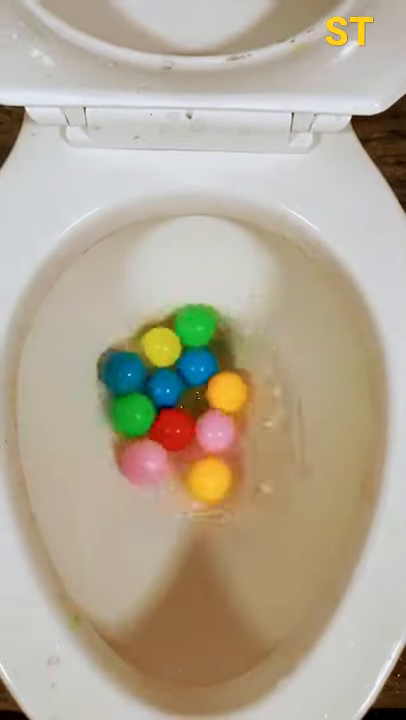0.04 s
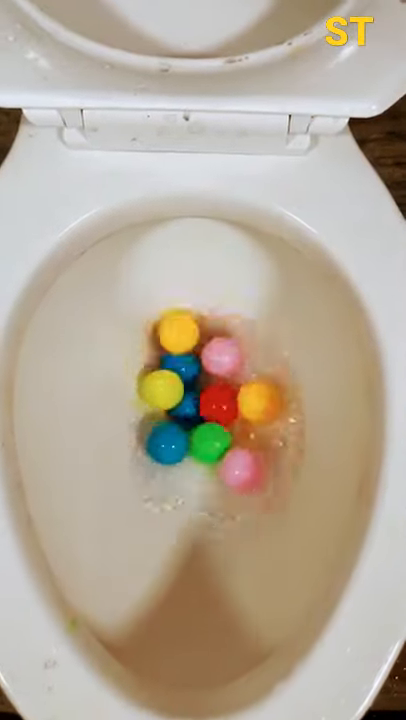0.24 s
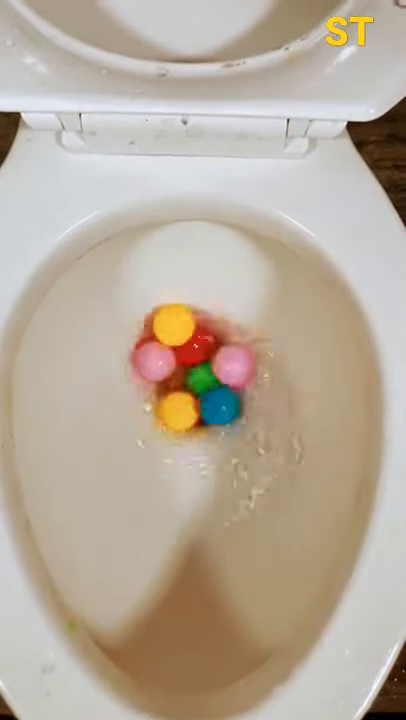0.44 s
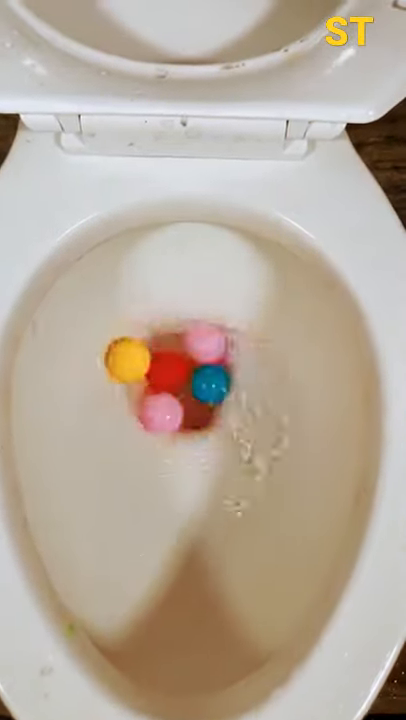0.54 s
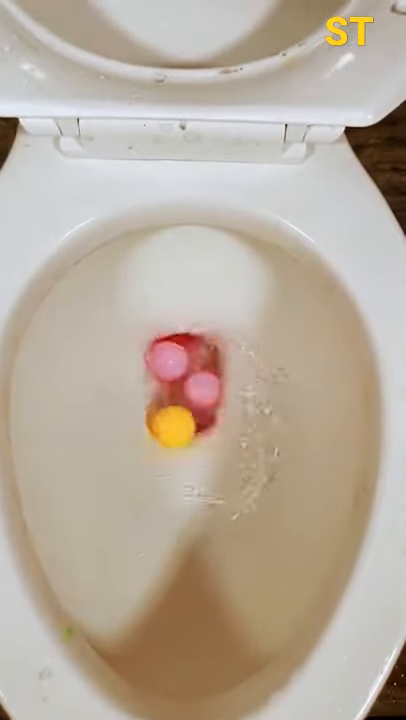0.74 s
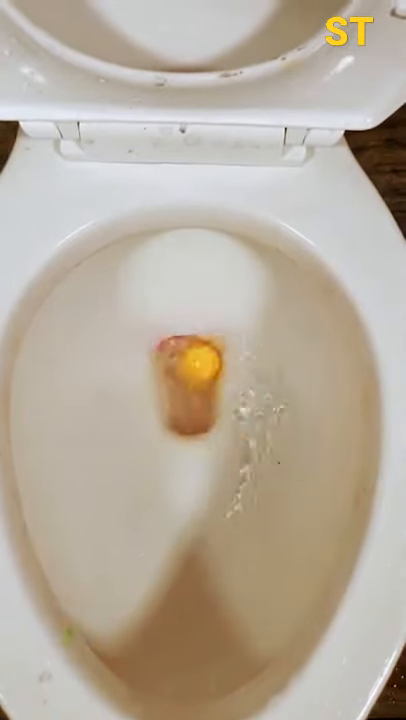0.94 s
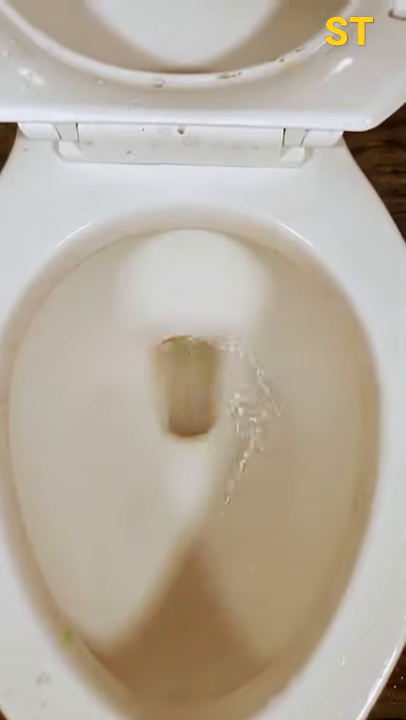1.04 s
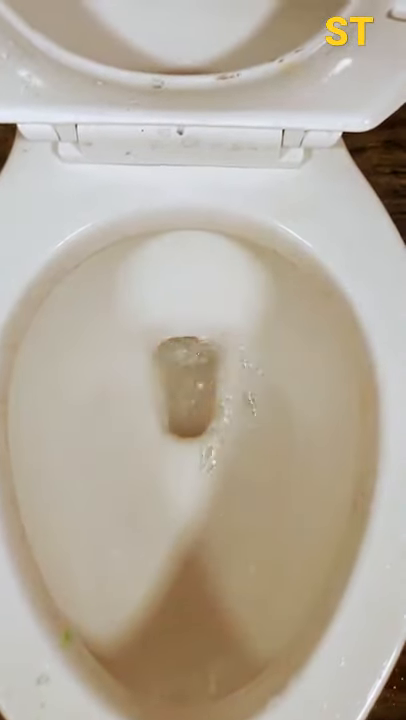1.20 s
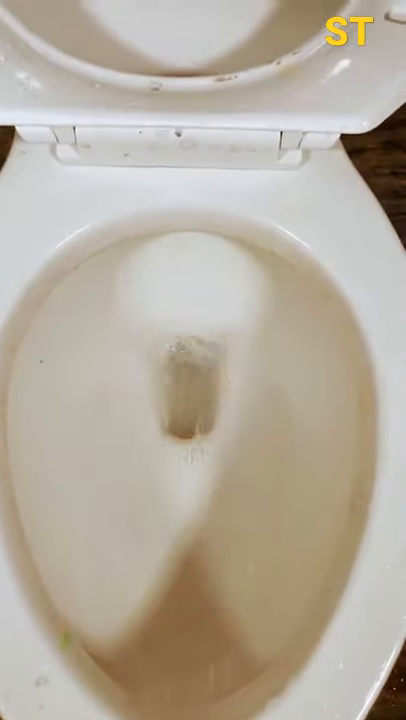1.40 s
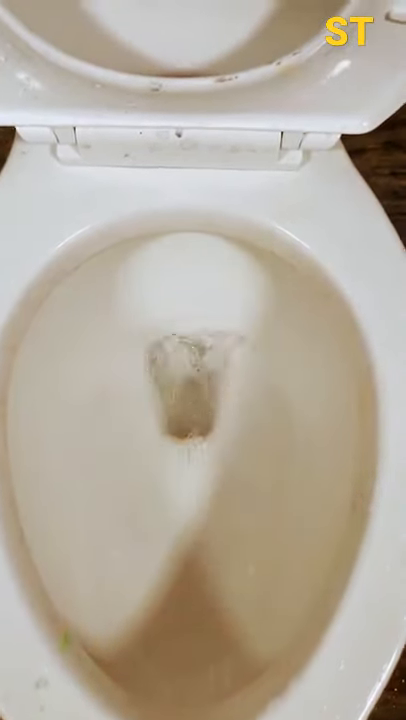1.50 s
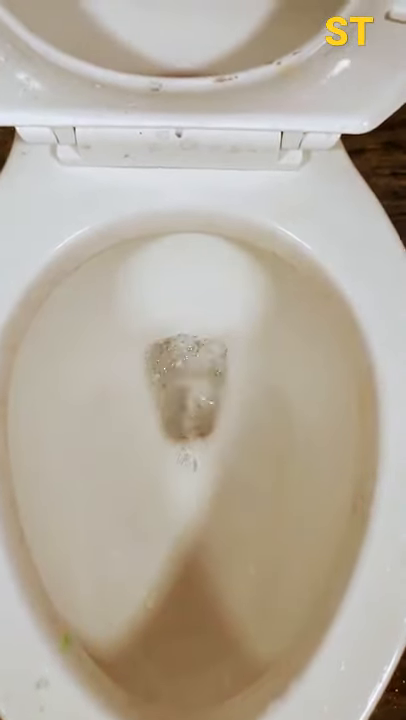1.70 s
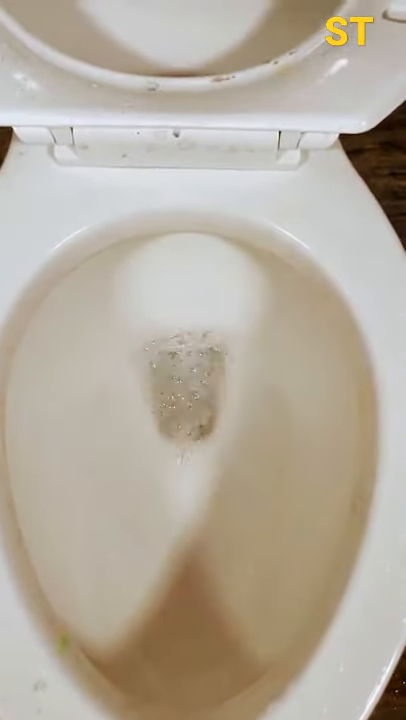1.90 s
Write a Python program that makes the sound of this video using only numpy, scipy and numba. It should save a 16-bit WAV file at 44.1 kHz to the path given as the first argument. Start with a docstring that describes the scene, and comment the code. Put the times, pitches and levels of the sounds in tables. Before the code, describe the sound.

Close stereo pickup of a toilet flush: water hisses and fizzes, the drain quickly gulps air in thick glugs while hollow balls click lightly, then the gurgling breaks up and tapers off with short bathroom echoes.

```python
"""A toilet flushes, heard from just above the bowl. Water swirls light balls down the drain, which gulps air in deep glugs.
The balls knock together, pockets of air plop, small bubbles babble, and the rim jets spray until the flow tapers off.
Glugs, plops and bubbles are damped sines of rising pitch; spray joins such bubbles to filtered noise; knocks are short modes.
The bowl and a small bathroom ring briefly; two microphone ports a few centimetres apart pick it up."""
import sys
import numpy as np
from scipy import signal
from scipy.fft import rfft, irfft
from scipy.io import wavfile
from numba import njit

SR = 44100
rng = np.random.default_rng(int(sys.argv[2]) if len(sys.argv) > 2 else 0)


def file_out(sig):
    """Save sig as 16-bit WAV at sys.argv[1]."""
    # one column per channel
    cols = np.atleast_2d(sig).T
    # limit, then scale
    lim = np.clip(cols, -1, 1)
    pcm = np.round(lim * 32767).astype(np.int16)
    wavfile.write(sys.argv[1], SR, pcm)


N = 85995  # samples, 1.95 s
T = np.arange(N) / SR
BINS_HZ = np.arange(N // 2 + 1) * SR / N

# Level of the rumble in the pipes. Each row: time in seconds, relative level in dB.
PIPE_LEVEL = [(0,3),(0.6,-2.5),(1.3,-1),(1.95,-8)]
# Level of the babbling swirl. Each row: time in seconds, relative level in dB.
SWIRL_LEVEL = [(0,-40.5),(0.17,-41.5),(0.29,-34),(0.44,-25.5),(0.6,-28),(0.8,-31),(1.12,-33),(1.3,-36.5),(1.42,-28.5),(1.53,-33.5),(1.6,-37),(1.74,-38),(1.95,-39.5)]
# Level of the gurgling drain. Each row: time in seconds, relative level in dB.
GURGLE_LEVEL = [(0,-45.5),(0.24,-38.5),(0.35,-30),(0.52,-23.5),(0.62,-25),(0.78,-32.5),(0.95,-37),(1.18,-30),(1.3,-35),(1.5,-35.5),(1.6,-37),(1.95,-44)]
# Level of the fizzing bubbles. Each row: time in seconds, relative level in dB.
FIZZ_LEVEL = [(0,-33),(0.15,-36.5),(0.35,-31),(0.62,-33.5),(0.75,-33.5),(0.87,-31),(1.08,-32),(1.28,-34.5),(1.43,-33.5),(1.63,-35.5),(1.82,-34.5),(1.95,-42)]
# Level of the rim spray. Each row: time in seconds, relative level in dB.
SPRAY_LEVEL = [(0,-39),(0.22,-38.5),(0.45,-34),(0.62,-33),(0.71,-35),(0.86,-34),(0.99,-35.5),(1.06,-34.3),(1.25,-36.5),(1.43,-35),(1.62,-37),(1.8,-41),(1.95,-45)]

# Single small bubbles that ring out. Each row: start in seconds, relative level in dB, middle pitch in Hz.
BUBBLE_DRIPS = [(0.027,-14.5,2980),(0.229,-8.5,2610),(0.238,-8.5,1980),(0.29,-10.5,2500),(0.324,-15,3300),(0.424,-17,6700),(0.47,-11,3480),(0.505,-21,3100),(0.6641,-5.5,3810),(0.73,-13,5780),(0.78,-16,3800),(0.787,-17,5640),(0.835,-14,2570),(0.867,-17,2600),(0.934,-13.5,5860),(0.9532,-7.5,2340),(1.05,-14,6130),(1.083,-11.5,3550),(1.406,-15,2730),(1.4655,-11.5,3420),(1.529,-21,3850),(1.726,-8.5,1940),(1.774,-14,3360),(1.8113,-10.5,3270)]
# Plops in the swirl. Each row: start in seconds, relative level in dB, middle pitch in Hz,
# relative level of the splash in dB.
SWIRL_PLOPS = [(0.22,-11,686,-45),(0.22,-13.5,1320,-37),(0.2699,-15,1315,-30.5),(0.272,-12,700,-50),(0.3518,-15,1220,-42),(0.376,-25,1230,-32),(0.382,-24,1430,-26.5),(0.4125,-4.5,1206,-42),(0.4402,-8,1290,-32),(0.460,-6.5,1100,-33),(0.468,-11,1220,-28),(0.484,-7,1180,-37),(0.5103,-11,1180,-29.5),(0.527,-10,1143,-36),(0.5971,0,1280,-26.5),(0.6092,-9,1360,-29),(0.617,-7,1520,-30),(0.6222,-3.5,1496,-26.5),(0.636,-5.5,1005,-25.5),(0.6732,-7.5,1290,-30.5),(0.708,-19,1310,-45),(0.721,-32,1072,-50),(0.762,-9.5,1330,-36),(0.827,-14,1210,-41),(0.847,-8,1226,-31.5),(0.8916,-7.5,1130,-33.5),(0.99,-13,1320,-48),(1.0207,-3.5,1020,-28.5),(1.0264,-3,1160,-29),(1.045,-15,640,-39),(1.104,-15,1110,-33),(1.132,-13,1120,-36),(1.264,-20,1240,-31),(1.367,-21,1315,-32),(1.387,-12,1090,-46),(1.3927,-4,1283,-29),(1.435,-17,1190,-30.5),(1.482,-18,1090,-46),(1.514,-17,1330,-33),(1.571,-11,1100,-36),(1.915,-18,1200,-52)]
# Glugs of the drain. Each row: start in seconds, relative level in dB, middle pitch in Hz,
# relative level of the upper resonance in dB.
DRAIN_GLUGS = [(0.283,-20.5,294,-28),(0.299,-17.5,320,-40),(0.375,-21,340,-47),(0.413,-7,271,-15),(0.429,-9.5,301,-47),(0.468,-11.5,321,-43),(0.483,-12,310,-37),(0.509,-8,330,-21),(0.535,-5.5,318,-43),(0.5512,-4.5,371.5,-10.5),(0.559,-19,325,-46),(0.578,-9,307,-35),(0.632,-8,314,-40),(0.6435,-40,294,-9),(0.675,-8.5,329,-24),(0.707,-14.5,381,-43),(0.722,-3.5,355,-46),(0.764,-18,330,-24),(0.821,-11,316,-31),(0.858,-9.5,372,-20),(0.891,-8.5,322,-44),(0.911,-17,310,-43),(0.931,-8.5,290,-21),(0.99,-15,370,-24),(1.004,-5.5,335,-35),(1.024,-27,330,-15.5),(1.095,-16,347,-12),(1.116,-25,344,-24),(1.13,-22,340,-33),(1.163,-13,311,-32),(1.181,-15.5,312,-32),(1.208,-15.5,314,-25.5),(1.229,-21,305,-39),(1.325,-18.5,323,-34),(1.347,-21.5,331,-36),(1.386,-18,334,-30),(1.406,-17,305,-48),(1.448,-14,283,-47),(1.498,-15,312,-25.5),(1.666,-20.5,314,-44)]
# Spits of spray on the porcelain. Each row: start in seconds, relative level in dB.
SPRAY_SPITS = [(0.2912, -18), (0.4373, -10.5), (0.4664, -11), (0.5497, -12), (0.599, -9), (0.7794, -12),
               (1.049, -12), (1.0834, -11.5), (1.409, -10), (1.4444, -10.5), (1.5215, -12.5)]
# Knocks of the balls. Each row: start in seconds, relative level in dB, lowest mode in Hz.
BALL_KNOCKS = [(0.3378,-7,1320),(0.3818,-21,1580),(0.55,-12,1274),(0.6055,-17,1330),(0.644,-16,1370),(1.1015,-16,1430)]
# Modes of a hollow ball. Each row: ratio to the lowest mode, relative level in dB, decay in seconds.
HOLLOW_BALL_MODES = [(1,2,0.00087),(1.5,-10.5,0.0043),(2.2,-11,.0012),(3.1,-11.5,0.0015)]

# Filter that shapes the rumble in the pipes. Each row: frequency in Hz, gain in dB.
PIPE_SPECTRUM = [(20,-23),(40,-12),(60,4.5),(85,1),(115,4),(150,-7),(192,6.5),(240,-13.5),(480,-2),(800,-6.5),(2000,-27),(6000,-49)]
# Filter that shapes the swirling water. Each row: frequency in Hz, gain in dB.
SWIRL_SPECTRUM = [(150,-41),(350,-41),(500,-3.5),(700,3),(860,-13.5),(1020,2),(1150,3.5),(1300,4.5),(1520,4.5),(1720,-6.5),(1930,-7),(2200,-25),(3200,-8.5),(5000,-37),(8000,-80)]
# Filter that shapes the gurgle in the drain. Each row: frequency in Hz, gain in dB.
GURGLE_SPECTRUM = [(120,-12),(190,-7),(240,-5),(300,-2),(390,-3),(460,-7.5),(620,-5.5),(720,-14),(850,-7.5),(1200,-54),(3000,-70)]
# Filter that shapes the fizz and the splashes. Each row: frequency in Hz, gain in dB.
FIZZ_SPECTRUM = [(600,-39),(1200,11),(1900,4.5),(2600,0.5),(4000,-2.5),(5000,-6.5),(7000,-1),(10000,-23),(13000,-50)]
# Filter that shapes the spray and the spits. Each row: frequency in Hz, gain in dB.
SPRAY_SPECTRUM = [(900,-26),(2000,-13),(3500,-4),(5000,-5.5),(6000,-.5),(8500,-.5),(9600,0),(10600,3),(11500,1),(12400,-7),(13200,-17),(14000,-38)]
# How fast the spray flutters. Each row: flutter rate in Hz, gain in dB.
FLUTTER_SPECTRUM = [(4, 5), (12, -7), (60, -9), (250, -60), (900, -70)]

# Share of the fizz heard from near the rim. Each row: frequency in Hz, gain in dB.
RIM_FIZZ_SHARE = [(1900,-16),(2900,-4)]
# Share of the fizz heard from deep in the bowl. Each row: frequency in Hz, gain in dB.
DEEP_FIZZ_SHARE = [(1900,-1),(4000,2.5),(6500,-50.5)]
# The bowl radiates little bass. Each row: frequency in Hz, gain in dB.
BOWL_BASS_LOSS = [(40,-25),(120,-16),(230,-1.5)]
# Resonances of the air in the bowl. Each row: frequency in Hz, relative level in dB, 60 dB decay in seconds.
BOWL_RESONANCES = [(190,-26,0.2),(296,1,0.06),(391,5.5,0.1),(613,-15,0.04),(1013,6,0.065),(1330,-2,0.072),(1564,-15,0.06),(1900,-19,0.044)]
# Walls soak up the treble. Each row: frequency in Hz, gain in dB.
WALL_COLOUR = [(300,-1),(1000,1),(2800,0.5),(4500,3),(7000,-14),(12000,-66)]
# How unlike the echoes are at the two ports. Each row: frequency in Hz, side against mid in dB.
ECHO_WIDTH = [(200,-22),(600,-10),(1000,-4),(1800,-6),(2700,2),(4500,2)]
# The deep sounds at the two ports. Each row: frequency in Hz, left over right in dB.
DEEP_BALANCE = [(100,4.5),(300,-3.5),(480,5.5),(680,-1.5),(850,12),(1020,11.5),(1400,5),(1700,0.5),(2000,-1),(3000,1),(5000,7)]
# The deep sounds at the two ports. Each row: frequency in Hz, lead of the left in radians.
DEEP_PHASE = [(150,0),(300,.3),(430,.7),(510,.25),(780,1.4),(860,1.2),(960,-1.3),(1100,-.3),(1600,-.1),(2100,.2),(2700,.8),(3700,0),(4400,.6)]

# Layer trims are in dB; a glide is the fraction by which the pitch bends below and above its middle
PIPE_DB, SWIRL_DB, CHURN_DB, GURGLE_DB = -35.5, 0, -13, 0
FIZZ_DB, WASH_DB, DROPS_DB, HISS_DB = -3, -6.5, -3.5, 0
FLUTTER_RMS_DB = 2.3
DRIP_DB, DRIP_RISE_S, DRIP_DECAY_S, DRIP_GLIDE = -13, 0.0018, 0.0028, 0.054
PLOP_DB, PLOP_RISE_S, PLOP_DECAY_S, PLOP_GLIDE = -5.5, 0.0011, 0.0027, 0.027
SPLASH_DB, SPLASH_DECAY_S = 9, 0.0063
GLUG_DB, GLUG_RISE_S, GLUG_DECAY_S, GLUG_GLIDE = -0.5, 0.003, 0.0057, 0.091
UPPER_DB, UPPER_RISE_S, UPPER_DECAY_S = 6, 0.0017, 0.0036
UPPER_HZ, UPPER_SCATTER = 648, 0.04  # scatter is a fraction either way
SPIT_DB, SPIT_DECAY_S = -6.5, 0.0033
KNOCK_DB, KNOCK_CONTACT_S = 0.5, 0.00025
BOWL_DB, ROOM_DB, ROOM_T60_S = -6, -8, 0.083
PORT_LAG_MS = 0.17
LOW_CUT_HZ, TOP_HZ, CEILING = 30, 14000, 0.92  # the ceiling is a share of full scale


def undb(db):
    """Decibels to gain."""
    return 10 ** (np.asarray(db) / 20)


def unit(x):
    """Scale to an rms of one."""
    return x / np.sqrt(np.mean(x ** 2))


def follow(curve):
    """Gain along a level curve."""
    return undb(np.interp(T, *np.array(curve).T))


def per_bin(points):
    """Join points by straight lines on a log-frequency axis."""
    hz, value = np.array(points).T
    return np.interp(np.log(BINS_HZ + 1), np.log(hz), value)


def colour(x, points):
    """Filter by a spectrum."""
    return irfft(rfft(x) * undb(per_bin(points)), N)


def coloured_noise(points):
    """Steady noise through a spectrum, at an rms of one."""
    return unit(colour(rng.standard_normal(N), points))


def add(out, start, sound):
    """Mix a sound in at a time."""
    i = max(int(start * SR), 0)
    out[i:i + len(sound)] += sound[:N - i]


def swell(rise, decay):
    """A rounded rise and an exponential decay."""
    t = T[:N // 20]
    attack = np.sin(np.pi / 2 * np.minimum(t / rise, 1)) ** 2
    return attack * np.exp(-np.maximum(t - rise, 0) / decay)


def pocket(hz, rise, decay, glide):
    """A pocket of air rings for a few cycles, its pitch rising as it nears the surface."""
    shape = swell(rise, decay)
    t = T[:len(shape)]
    pitch = hz * (1 + glide * np.tanh((t - rise) / decay - .5))
    return shape * np.sin(2 * np.pi * np.cumsum(pitch) / SR)


def bursts(rows, decay):
    """Short noise bursts of thrown water, from rows of start and level."""
    out = np.zeros(N)
    shape = swell(decay / 2, decay)
    for start, db in rows:
        add(out, start, undb(db) * shape * rng.standard_normal(len(shape)))
    return out


@njit
def ring(starts, hz, cycles, size, glide):
    """Sum of damped, rising sines, one for each bubble."""
    out = np.zeros(N)
    for k in range(len(hz)):
        length = int(cycles[k] * SR / hz[k]) + 2
        w = 2 * np.pi * hz[k] / SR
        z = size[k] + 0j
        step = np.exp(1j * w - 6 / length)  # turns and shrinks the phasor each sample
        bend = np.exp(1j * w * glide / length)  # here the glide is the whole rise over the life
        first = int(starts[k] * N)
        for i in range(first, min(first + length, N)):
            z *= step
            step *= bend
            out[i] += z.imag
    return out


def bubbles(count, low_hz, high_hz, cycles, spread_db, glide):
    """A cloud of bubbles of random start, pitch, life and size."""
    when, pitch, life, size = rng.random((count, 4)).T
    hz = low_hz * (high_hz / low_hz) ** pitch
    size_db = -spread_db * np.log(size + 1 / 40)  # a few stand out
    gain = undb(size_db) * np.sqrt(hz / low_hz)
    return ring(when, hz, cycles * (.5 + life), gain, glide)


def pipes():
    """The pipes rumble: low filtered noise."""
    return undb(PIPE_DB) * follow(PIPE_LEVEL) * coloured_noise(PIPE_SPECTRUM)


def swirl():
    """The whirling water folds in air: a babble of ringing bubbles over churning noise."""
    babble = bubbles(count=1500, low_hz=481.0, high_hz=3430, cycles=17.0, spread_db=3.5, glide=0.049)
    churn = undb(CHURN_DB) * coloured_noise(SWIRL_SPECTRUM)
    water = unit(colour(babble, SWIRL_SPECTRUM)) + churn
    return undb(SWIRL_DB) * follow(SWIRL_LEVEL) * water


def gurgle():
    """The trap gurgles: a dense cloud of low, overlapping bubbles whose pitch climbs."""
    cloud = bubbles(count=420, low_hz=187.7, high_hz=842, cycles=24.6, spread_db=2.0, glide=0.32)
    return undb(GURGLE_DB) * follow(GURGLE_LEVEL) * unit(colour(cloud, GURGLE_SPECTRUM))


def fizz():
    """Tiny bubbles ring in a wash of water noise around the bowl."""
    cloud = bubbles(count=1900, low_hz=1725, high_hz=9120, cycles=51, spread_db=1.5, glide=0.062)
    sparkle = undb(FIZZ_DB) * unit(colour(cloud, FIZZ_SPECTRUM))
    wash = undb(WASH_DB) * coloured_noise(FIZZ_SPECTRUM)
    return follow(FIZZ_LEVEL) * (sparkle + wash)


def spray():
    """The rim jets hiss and patter on the porcelain, fluttering as they break up."""
    drops = bubbles(count=1900, low_hz=3490, high_hz=12540, cycles=58, spread_db=3.5, glide=0.365)
    patter = undb(DROPS_DB) * unit(colour(drops, SPRAY_SPECTRUM))
    hiss = undb(HISS_DB) * coloured_noise(SPRAY_SPECTRUM)
    flutter_db = FLUTTER_RMS_DB * coloured_noise(FLUTTER_SPECTRUM)
    return (patter + hiss) * follow(SPRAY_LEVEL) * undb(flutter_db)


def drips():
    """Single small bubbles chirp: short sines of rising pitch."""
    out = np.zeros(N)
    for start, db, hz in BUBBLE_DRIPS:
        add(out, start, undb(db + DRIP_DB) * pocket(hz, DRIP_RISE_S, DRIP_DECAY_S, DRIP_GLIDE))
    return out


def plops():
    """Pockets of air folded into the swirl ring briefly, with little bass radiated."""
    out = np.zeros(N)
    for start, db, hz, _ in SWIRL_PLOPS:
        add(out, start, undb(db + PLOP_DB) * pocket(hz, PLOP_RISE_S, PLOP_DECAY_S, PLOP_GLIDE))
    return colour(out, BOWL_BASS_LOSS)


def splashes():
    """Each plop throws up a splash: a short burst of noise."""
    rows = [(start, db + SPLASH_DB) for start, _, _, db in SWIRL_PLOPS]
    return colour(bursts(rows, SPLASH_DECAY_S), FIZZ_SPECTRUM)


def glugs():
    """The trap gulps air: each pocket rings low, with an upper resonance on top."""
    out = np.zeros(N)
    for start, db, hz, upper_db in DRAIN_GLUGS:
        low = pocket(hz, GLUG_RISE_S, GLUG_DECAY_S, GLUG_GLIDE)
        add(out, start, undb(db + GLUG_DB) * low)
        upper_hz = UPPER_HZ * (1 + UPPER_SCATTER * rng.uniform(-1, 1))
        upper = pocket(upper_hz, UPPER_RISE_S, UPPER_DECAY_S, GLUG_GLIDE)
        add(out, start, undb(upper_db + UPPER_DB) * upper)
    return colour(out, BOWL_BASS_LOSS)


def spits():
    """The jets spit on the porcelain: short bursts of bright noise."""
    return undb(SPIT_DB) * colour(bursts(SPRAY_SPITS, SPIT_DECAY_S), SPRAY_SPECTRUM)


def balls():
    """Hollow balls knock against each other and the porcelain as they crowd into the drain."""
    out = np.zeros(N)
    for start, db, lowest_hz in BALL_KNOCKS:
        for ratio, mode_db, decay in HOLLOW_BALL_MODES:
            shape = swell(KNOCK_CONTACT_S, decay)
            tone = np.sin(2 * np.pi * lowest_hz * ratio * T[:len(shape)])
            add(out, start, undb(db + mode_db + KNOCK_DB) * shape * tone)
    return out


def bowl(x):
    """The air in the bowl rings on after each sound, as a bank of resonances."""
    response = 0
    for hz, db, t60 in BOWL_RESONANCES:
        decay = t60 / np.log(1000)  # time to fall by a factor of e
        response = response + undb(db) / (1 + 2j * np.pi * (BINS_HZ - hz) * decay)
    return x + undb(BOWL_DB) * irfft(rfft(x) * response, N)


def room(x):
    """A short tail of decaying noise from hard bathroom walls, different at each port."""
    t = T[:N // 4]
    tail = rng.standard_normal((2, len(t))) * undb(-60 * t / ROOM_T60_S)
    tail *= t > .004  # seconds before the first echo
    tail /= np.sqrt(np.sum(tail ** 2, axis=1, keepdims=True))
    mid, side = signal.fftconvolve(colour(x, WALL_COLOUR)[None], tail, axes=1)[:, :N]
    return undb(ROOM_DB) * (mid + np.array([[1], [-1]]) * colour(side, ECHO_WIDTH))


def ports(x, balance_db, phase):
    """Two microphone ports that differ in level and phase, half of each difference per side."""
    half = undb(balance_db / 2) * np.exp(.5j * phase)
    return irfft(rfft(x) * np.array([half, 1 / half]), N)


def scene():
    """Drain and swirl deep in the bowl, spray near the rim, rumbling pipes and the room."""
    ringing = bowl(glugs() + gurgle() + plops() + swirl())
    deep = ringing + balls() + drips() + colour(fizz() + splashes(), DEEP_FIZZ_SHARE)
    # the fizz and splashes near the rim are drawn afresh
    rim = spray() + spits() + colour(fizz() + splashes(), RIM_FIZZ_SHARE)
    lag_phase = 2 * np.pi * BINS_HZ * PORT_LAG_MS / 1000  # the rim reaches the left port first
    direct = ports(deep, per_bin(DEEP_BALANCE), per_bin(DEEP_PHASE)) + ports(rim, 0, lag_phase)
    return direct + pipes() + room(deep + rim)


def record(dry):
    """Cut the deepest bass, round the loudest peaks and cut the top."""
    low_cut = signal.butter(2, LOW_CUT_HZ, "highpass", fs=SR, output="sos")
    x = signal.sosfilt(low_cut, dry)
    x = x / (1 + (x / CEILING) ** 6) ** (1 / 6)
    top_cut = signal.ellip(8, .2, 70, TOP_HZ, fs=SR, output="sos")  # 0.2 dB ripple, 70 dB down
    return signal.sosfilt(top_cut, x)


dry = scene()
out = record(dry)
file_out(out)
```